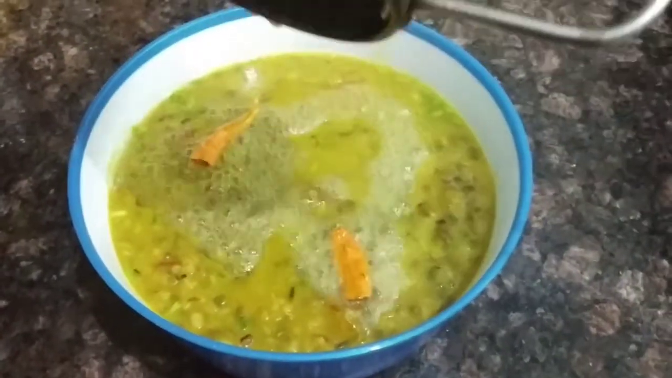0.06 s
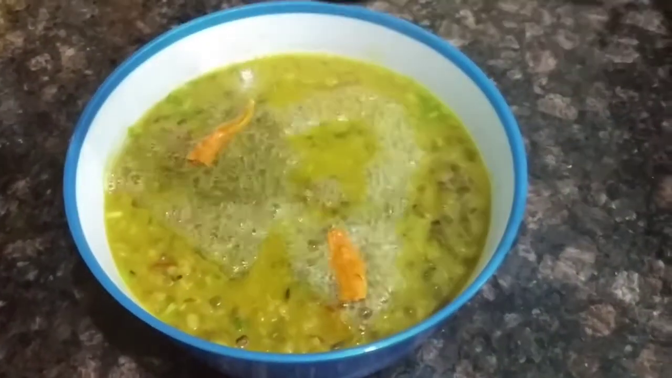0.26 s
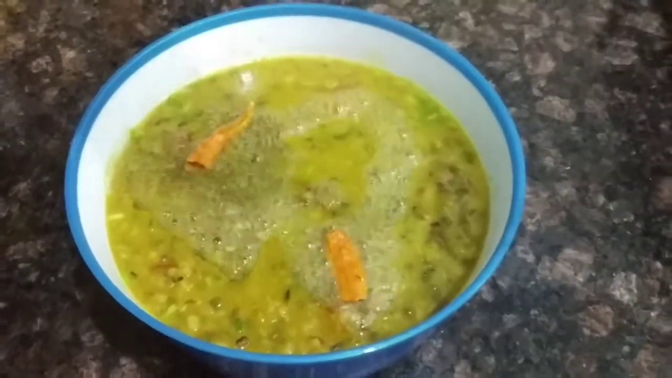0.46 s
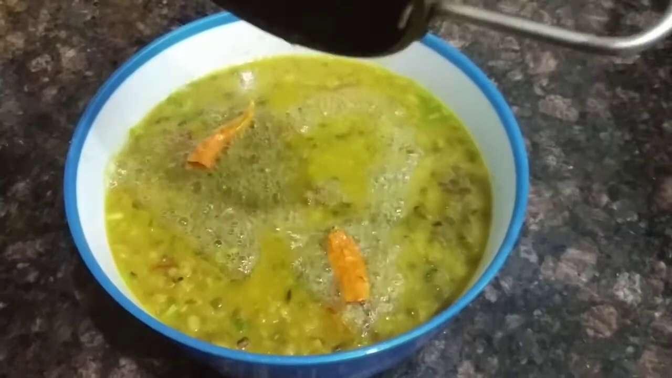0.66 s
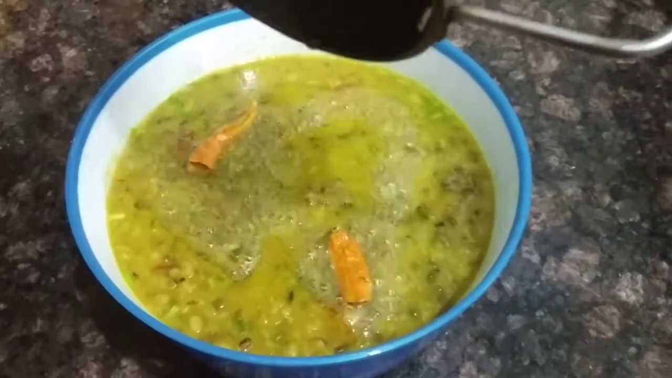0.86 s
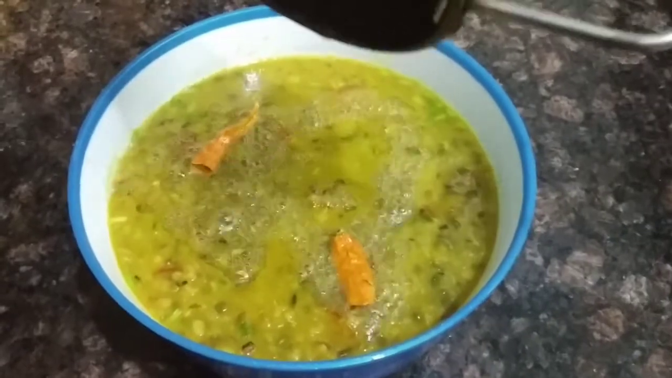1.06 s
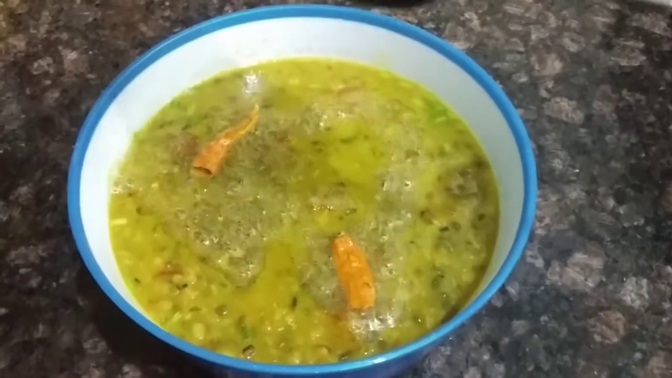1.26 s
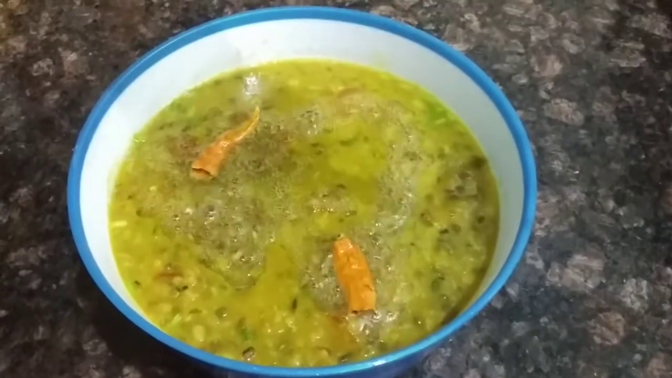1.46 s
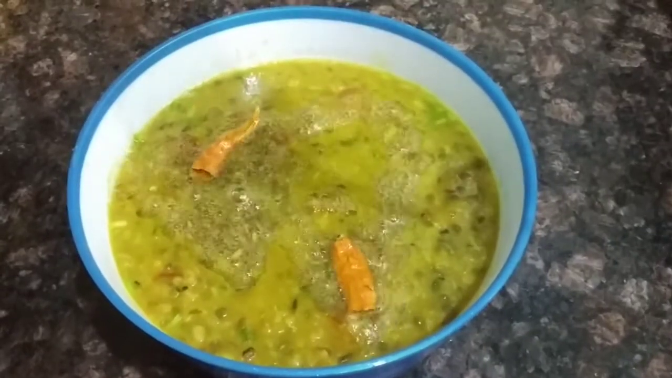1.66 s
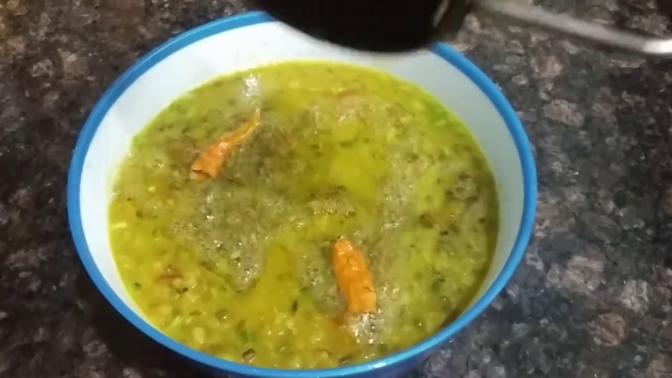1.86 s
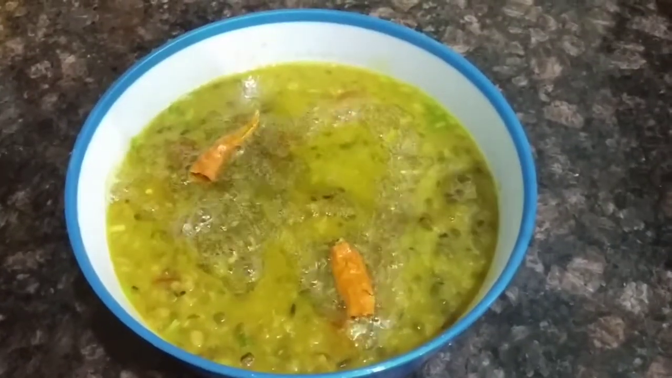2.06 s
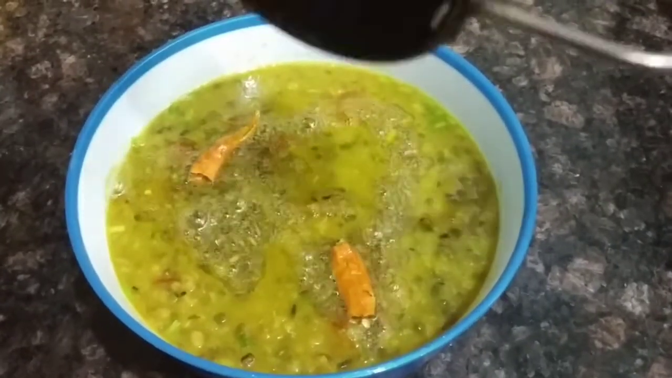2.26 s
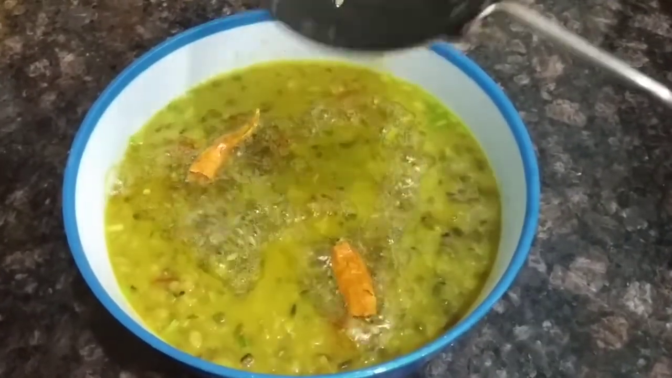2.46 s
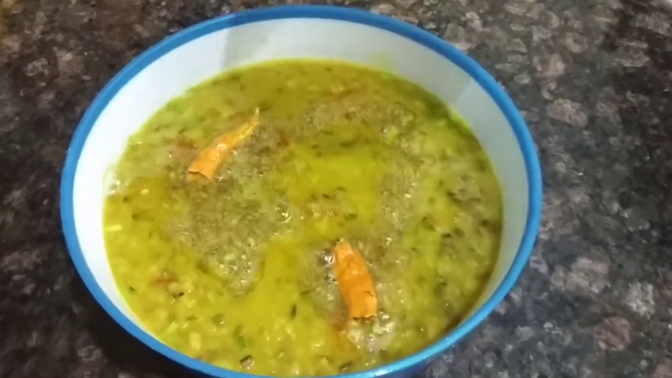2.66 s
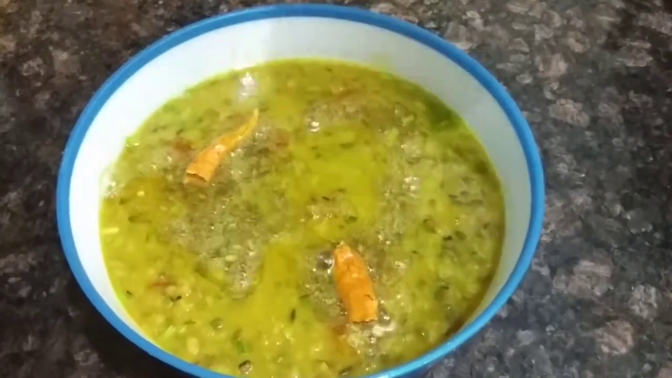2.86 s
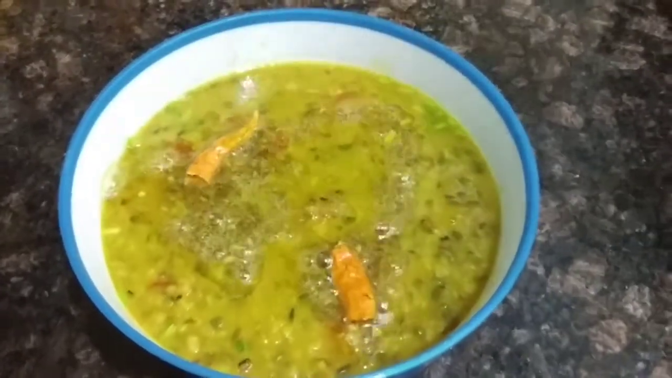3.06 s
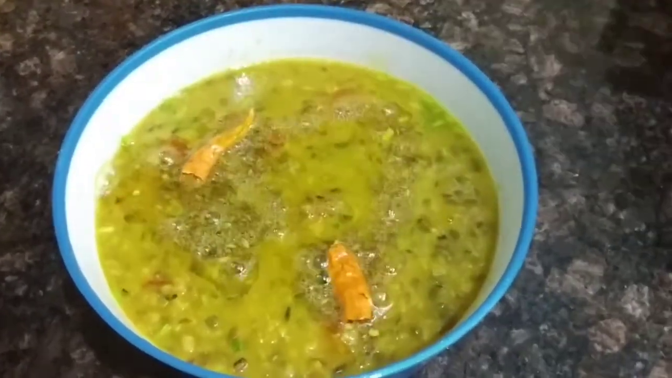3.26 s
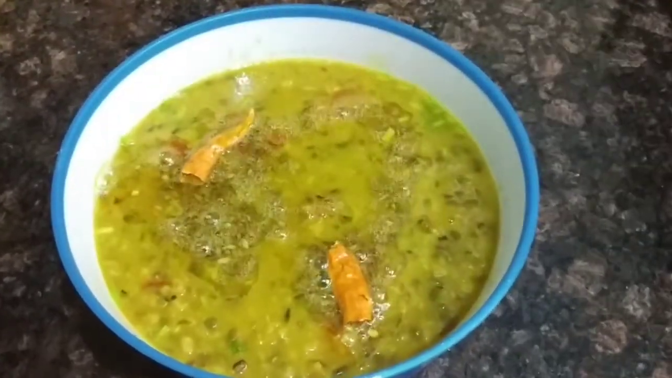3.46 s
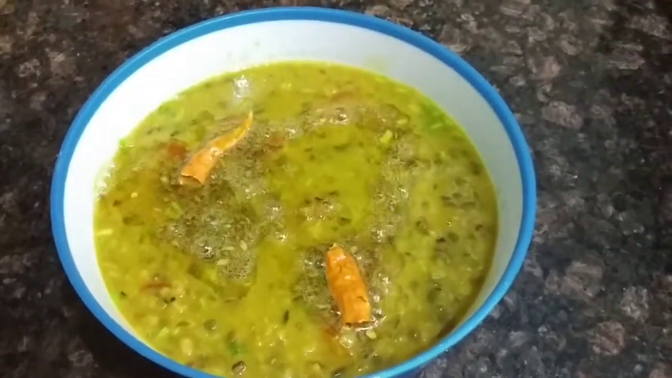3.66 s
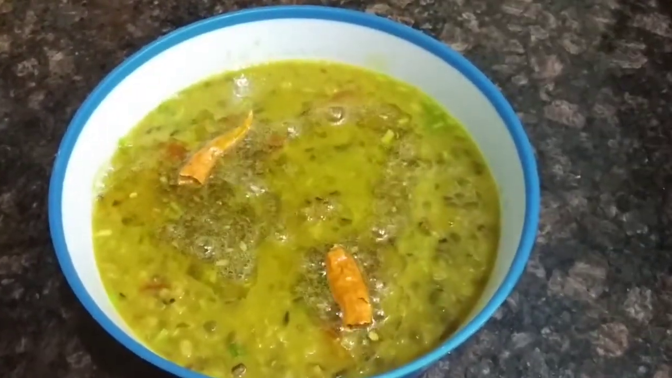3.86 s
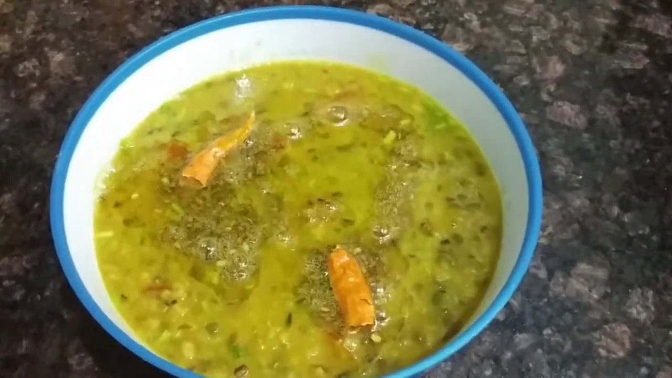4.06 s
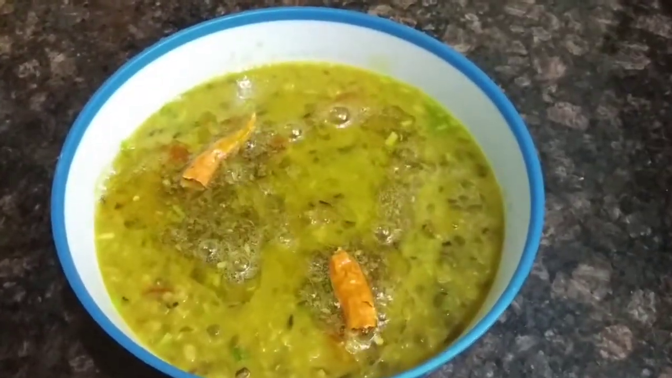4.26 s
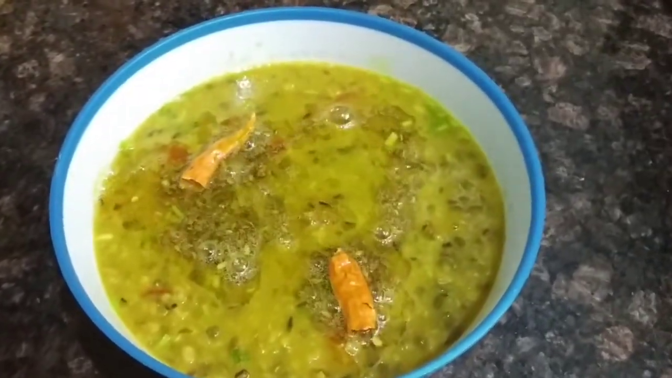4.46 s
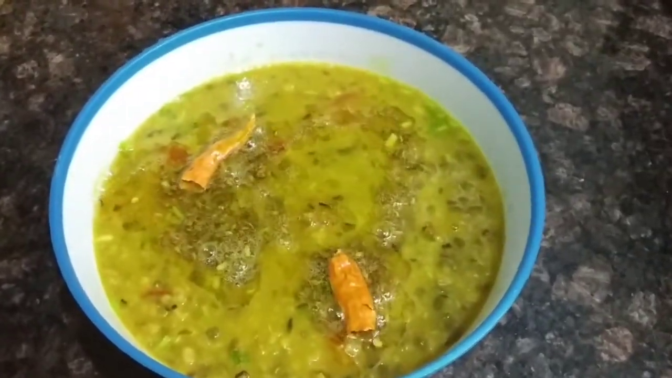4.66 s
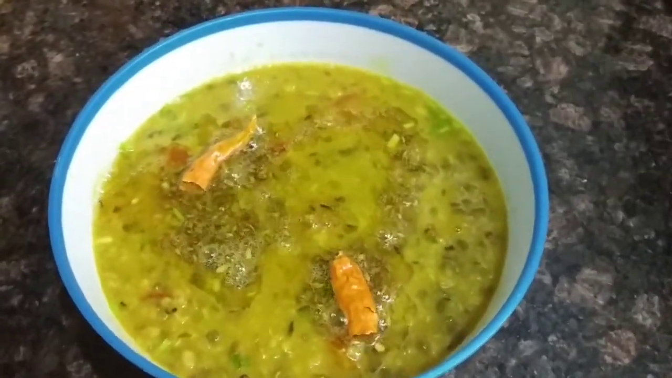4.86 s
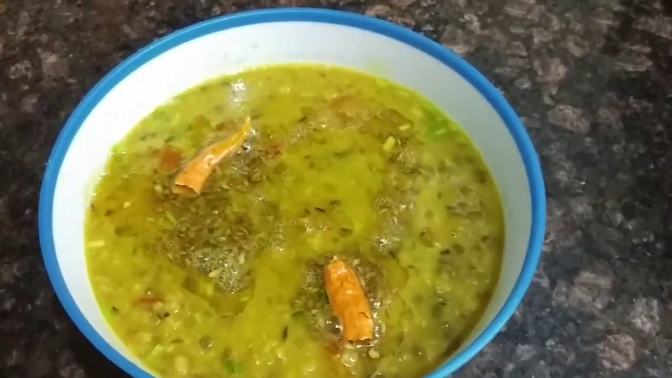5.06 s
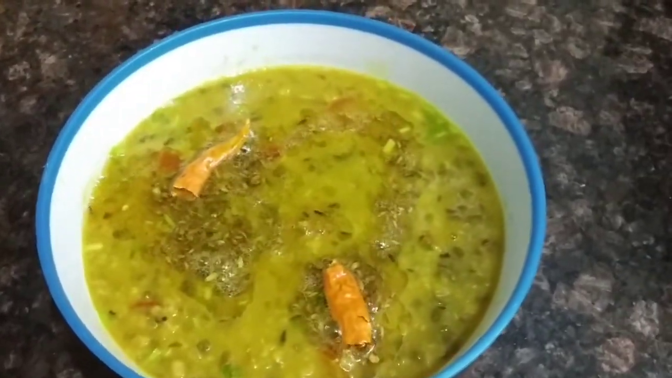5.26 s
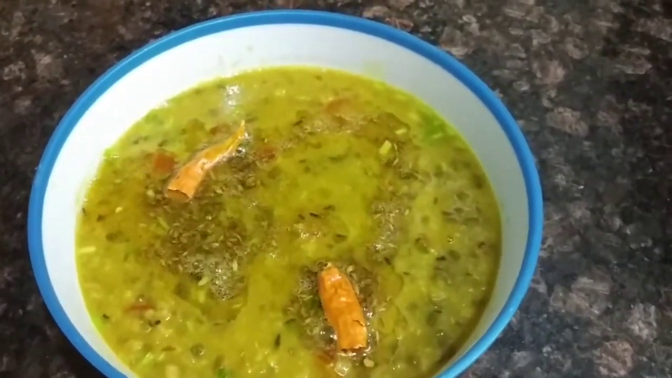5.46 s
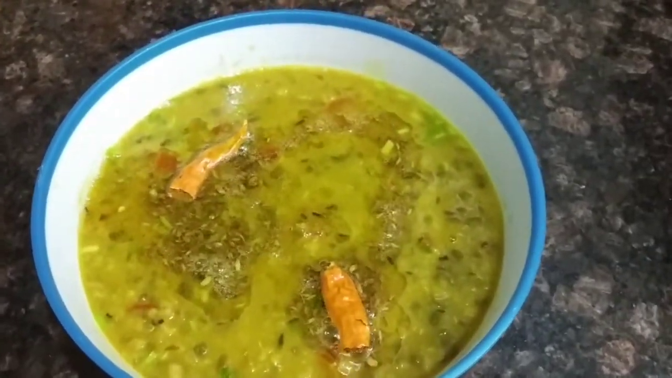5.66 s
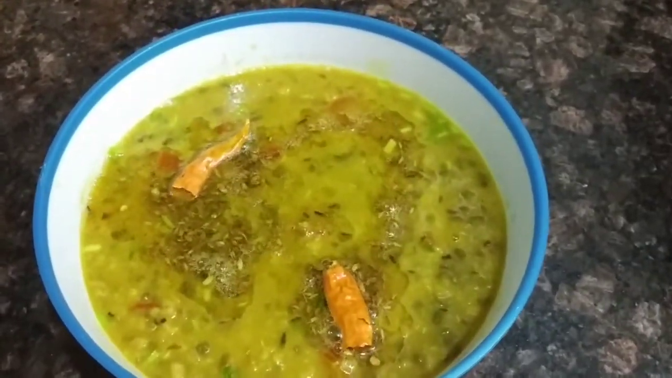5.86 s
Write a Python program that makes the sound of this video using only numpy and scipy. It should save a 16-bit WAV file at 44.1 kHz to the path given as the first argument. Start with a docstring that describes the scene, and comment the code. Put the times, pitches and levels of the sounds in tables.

```python
"""Hot spiced oil sizzles on a bowl of lentils in a small kitchen, close to a stereo microphone.
Clouds of short damped rings make the dense fizz; it breaks up into spurts and single bursts as the oil cools.
The emptied pan touches the stove twice and is set down with a clank: filtered noise and ringing modes.
A few clicks follow. A wavering sine is the fan's hum; shaped noise makes rumble, room air and hiss."""
import sys
import numpy as np
from scipy import signal
from scipy.fft import rfft, irfft, next_fast_len
from scipy.io import wavfile
from scipy.ndimage import uniform_filter1d, map_coordinates

SR = 44100
rng = np.random.default_rng(int(sys.argv[2]) if len(sys.argv) > 2 else 0)


def bounce(signal):
    """Save signal as a 16-bit WAV file at the path given by the first command-line argument."""
    frames = np.transpose(np.atleast_2d(signal))
    limited = np.clip(frames, -1, 1)
    pcm = np.round(limited * 32767).astype(np.int16)
    wavfile.write(sys.argv[1], SR, pcm)


N = 260614
TOP_HZ = 15800  # band limit
PORT_LAG_S = 0.000118  # the left port hears a burst or click this much after the right


def amp(db):
    """Decibel law: level to amplitude gain."""
    return 10 ** (np.asarray(db) / 20)


def unit(x):
    """Normalisation to rms 1."""
    return x / np.sqrt(np.mean(x ** 2) + 1e-20)


def along(points, hz):
    """Interpolation of (f/Hz, value) points on a logarithmic frequency axis."""
    f, v = np.transpose(points)
    return np.interp(np.log(hz + 1), np.log(f + 1), v)


def curves(rows):
    """Linear interpolation in time: one curve for each column after t/s."""
    times, *columns = np.transpose(rows)
    return [np.interp(np.arange(N) / SR, times, column) for column in columns]


def wobble(rate):
    """Band-limited random modulation: a smooth curve through `rate` random knots a second."""
    knots = rng.standard_normal(int(N * rate / SR) + 4)
    return map_coordinates(knots, [np.arange(N) * rate / SR])


def filtered(x, response):
    """Linear filtering: the spectrum of x times a response of frequency."""
    size = x.shape[-1]
    padded = next_fast_len(size + 8192)
    return irfft(rfft(x, padded) * response(np.fft.rfftfreq(padded, 1 / SR)), padded)[..., :size]


def panned(side_db):
    """Intensity stereo: left and right gains of mean power 1, left minus right in dB."""
    side_db = np.atleast_1d(side_db)
    pair = amp(np.array([side_db, -side_db]) / 2)
    return pair / np.sqrt(np.mean(pair ** 2, axis=0))


def add(out, s, x):
    """Superposition: mix x into out at time s."""
    part = out[:, max(0, round(s * SR)):][:, :x.shape[1]]
    part += x[:, :part.shape[1]]


def ring(turns, cycles):
    """Damped oscillation: swells for `cycles` periods, then dies; its envelope peaks at 1."""
    age = np.maximum(turns, 0) / cycles
    return np.sin(2 * np.pi * turns) * age * np.exp(1 - age)


def resonance(f, hz, width):
    """Simple resonator: response of one damped mode, 1 at its peak."""
    return 1j * f * width / (hz ** 2 - f ** 2 + 1j * f * width)


def surge(t, rise, hold, t60):
    """Attack, hold and exponential decay: gain that reaches 1 at t = 0."""
    return np.clip(1 + t / rise, 0, 1) * amp(-60 * np.clip((t - hold) / t60, 0, 2))


# likeness of the two channels of diffuse noise: (f/Hz, correlation)
CHANNEL_LIKENESS = [(60, 0.44), (280, 0.6), (640, 0.49), (1400, 0), (15000, 0.13)]


def diffuse(spectrum, size):
    """Diffuse field: shaped stereo noise of rms 1 whose channel correlation depends on frequency."""
    def response(hz):
        turn = np.arccos(np.clip(along(CHANNEL_LIKENESS, hz), -1, 1)) / 2
        return amp(along(spectrum, hz)) * [np.cos(turn), np.sin(turn)]
    mid, side = filtered(rng.standard_normal((2, size)), response)
    return unit(np.array([mid + side, mid - side]))


# microphone hiss: (f/Hz, relative spectral level/dB)
HISS_SPECTRUM = [(500, -7.5), (1500, -1), (4000, -6), (11000, -12.5), (15000, -8.5)]


def hiss():
    """Self-noise: a steady, faint microphone hiss."""
    return amp(-71.0) * diffuse(HISS_SPECTRUM, N)


# dull room noise: (f/Hz, relative spectral level/dB)
AIR_SPECTRUM = [(60, -5), (120, -7.5), (160, -6.5), (215, -5), (275, -1), (315, -2.5), (370, -3.5),
                (500, -7), (800, -15.5), (1500, -21), (5000, -34)]
# its mean level, about which it wavers: (t/s, level/dB)
AIR_LEVEL = [(0, -68), (1.0, -68.5), (1.5, -63.5), (1.8, -69.5), (2.4, -67.5), (3.05, -64.5), (3.45, -68.5),
             (4.8, -69), (5.2, -65), (5.6, -71.5)]


def room_air():
    """Broadband noise, weighted to the bass and modulated in level."""
    level_db, = curves(AIR_LEVEL)
    return amp(level_db + 2.9 * wobble(19)) * diffuse(AIR_SPECTRUM, N)


# low rumble: (f/Hz, relative spectral level/dB)
RUMBLE_SPECTRUM = [(10, -7), (22, -0.5), (42, -2), (55, -4.5), (70, -7), (110, -12), (170, -24.5),
                   (500, -49), (1500, -120)]
# its swells, before the lumpy gain: (t/s, level/dB, hold/s)
RUMBLE_SWELLS = [(1.023, -62, 0.098), (1.336, -54.5, 0.26), (2.343, -55, 0.21), (2.699, -64.5, 0.61),
                 (4.806, -62.5, 0.53), (5.67, -54, 0.039)]
RUMBLE_FLOOR_DB, RUMBLE_RISE_S, RUMBLE_T60_S = -62.5, 0.037, 0.47  # floor also before the lumpy gain


def rumble():
    """Amplitude modulation: low noise that swells over a floor and is lumpy throughout."""
    t = np.arange(N) / SR
    swells = amp(RUMBLE_FLOOR_DB)
    for s, db, hold in RUMBLE_SWELLS:
        swells = swells + amp(db) * surge(t - s, RUMBLE_RISE_S, hold, RUMBLE_T60_S)
    lumps = amp(2.0 * wobble(16) - 4.0)
    return swells * lumps * diffuse(RUMBLE_SPECTRUM, N)


# the hum swells and sinks: (t/s, mean level/dB)
FAN_LEVEL = [(0, -72), (0.62, -66), (1.2, -73), (1.6, -59), (2.7, -56.5), (3.22, -71), (3.45, -64),
             (4.3, -54), (4.92, -73), (5.08, -61), (5.9, -58)]
FAN_HZ, FAN_WANDER_HZ, FAN_WAVER_DB = 83.2, 0.28, 0.75


def fan():
    """Frequency and amplitude modulation: one sine, wavering in pitch and level, is the fan's hum."""
    level_db, = curves(FAN_LEVEL)
    hz = FAN_HZ + FAN_WANDER_HZ * wobble(5.8)
    gain = np.sqrt(2) * amp(level_db + FAN_WAVER_DB * wobble(7.9))
    return gain * np.sin(2 * np.pi * np.cumsum(hz) / SR)


def background():
    """Superposition of hum, rumble, room air and hiss, stronger on the right."""
    return (fan() + rumble() + room_air() + hiss()) * panned(-3.5)


# the fade is per thump
FLUTTER_START_S, FLUTTER_PER_S, FLUTTER_DB, FLUTTER_HZ, FLUTTER_FADE_DB = 1.15, 21, -46, 18.7, 2.0


def flutter():
    """Impulsive pressure pulses: uneven, weakening low thumps, perhaps air buffeting the microphone."""
    out, t = np.zeros((2, N)), np.arange(SR // 5) / SR
    for k, (timing, size) in enumerate(rng.standard_normal((10, 2))):
        gain = amp(FLUTTER_DB - FLUTTER_FADE_DB * k + 1.47 * size)
        thump = gain * ring(FLUTTER_HZ * t, cycles=0.28)
        add(out, FLUTTER_START_S + (k + 0.093 * timing) / FLUTTER_PER_S, thump * panned(-5.0))
    return out


# reverberation of the kitchen: (f/Hz, T60/s)
KITCHEN_T60 = [(200, 0.51), (1000, 0.66), (4000, 0.16), (14000, 0.3)]


def kitchen(x):
    """Reverberation: hard walls answer with noise that decays at a rate set by frequency."""
    hz, t, z = signal.stft(rng.standard_normal((2, SR * 3 // 4)), SR, nperseg=256)
    decay = amp(-60 * t / along(KITCHEN_T60, hz)[:, None])
    tail = signal.istft(z * decay, SR, nperseg=256)[1]
    tail = np.pad(tail, ((0, 0), (130, 0)))  # samples of delay before the tail
    mono = x.sum(0)[None] / np.sqrt(2)
    return signal.fftconvolve(mono, tail / np.linalg.norm(tail[0]), axes=1)[:, :N] * panned(-2.3)


def counter(x):
    """Early reflection: the bowl's wall and the stone counter throw back a few quick echoes."""
    echoes = np.zeros((2, SR // 50))
    for port in echoes:
        port[rng.integers(SR // 2000, SR // 65, size=8)] = rng.standard_normal(8)
    echoes /= np.linalg.norm(echoes, axis=1, keepdims=True)
    return signal.fftconvolve(x, echoes, axes=1)[:, :N]


# light clicks of something hard, perhaps the stove's knob:
# (t/s, snap level/dB, f/Hz, chatter level/dB before its decay gain)
CLICKS = [(5.1489, -29.5, 2980, -47), (5.2388, -39, 2757, -62.5), (5.2987, -44, 3930, -79),
          (5.3092, -42, 3200, -73), (5.415, -37, 3950, -51.5), (5.4256, -34, 5374, -64)]
CLICK_EDGE_DB, CLICK_EDGE_HZ = -5, 5260  # bright edge, relative to the snap


def clicks():
    """Transient excitation: a sudden damped snap with a bright edge, then decaying noise as parts chatter."""
    out, t = np.zeros((2, N)), np.arange(SR // 3) / SR
    heard = t - np.array([[PORT_LAG_S], [0]])
    for s, db, hz, chatter_db in CLICKS:
        edge = amp(CLICK_EDGE_DB) * ring(CLICK_EDGE_HZ * heard, cycles=0.44)
        snap = ring(hz * heard, cycles=0.72) + edge
        grain = np.repeat(rng.standard_normal(len(t)), 48)[:len(t)]
        grit = rng.standard_normal((2, len(t))) * amp(1.2 * grain)
        chatter = unit(filtered(grit, lambda f: 1 / (1 + 1.63 * (f / hz - hz / (f + 1)) ** 2)))
        # quick, medium and slow decays together
        dying = amp(8.5 - 60 * t / 0.0098) + amp(-60 * t / 0.13) + amp(-9.0 - 60 * t / 0.4)
        add(out, s, amp(db) * snap + amp(chatter_db) * dying * chatter)
    return out * panned(-5.5)


# the pan's modes, shared by rattle and strikes: (f/Hz, relative level/dB, T60/s of a struck mode)
PAN_MODES = [(270, -6, 0.44), (365.4, -6, 0.34), (395.2, -2.5, 0.17), (505, -6, 0.3), (602, -7, 0.28),
             (730.4, -7.5, 0.33), (1170, -7, 0.24), (1243, -6, 0.21), (1298, -1, 0.15), (1477, -4, 0.14),
             (1660, -1, 0.18), (1780, -4, 0.2), (1870, -3, 0.13), (2030, -4.5, 0.2), (2180, 0, 0.14),
             (2440, -2, 0.18), (2680, -8, 0.2), (3090, -4, 0.18), (3720, -6, 0.15), (3970, -2, 0.17),
             (4730, 1, 0.19), (5577, 0, 0.086), (6170, 6, 0.084), (6430, 4.5, 0.11), (7360, -9, 0.2),
             (8306, -11, 0.15), (10600, -5.5, 0.17)]
# clatter of pan on stove: (f/Hz, relative spectral level/dB)
CLATTER_SPECTRUM = [(100, -1.5), (200, -1), (270, 0.5), (400, -4), (750, 3), (1000, -3), (1350, -3),
                    (2300, -0.5), (3100, -10), (6500, -10), (9000, -22), (15000, -40)]
# rattles: (t/s, level/dB before the mix, low-pass corner f/Hz, rise constant/s, hold/s, T60/s,
#           hollow note f/Hz, note width/Hz, note relative level/dB)
RATTLES = [(3.884, -47, 2784, 0.003, 0.033, 0.1, 1300, 160.2, -10),
           (4.131, -49, 1700, 0.005, 0.025, 0.21, 806, 258, 1.5),
           (4.2969, -37.5, 6500, 0.0011, 0.055, 0.18, 377, 69, -10.5)]
RATTLE_VALLEY_DB = -2  # response of the clatter between the pan's modes


def pan():
    """Forced vibration: the pan rattles to rest on the stove, a dense noise that feeds its modes."""
    out, t = np.zeros((2, N)), np.arange(SR * 2 // 3) / SR
    mode_hz, mode_db, _ = np.transpose(PAN_MODES)[:, :, None]

    def body(f):
        modes = amp(mode_db) * resonance(f, mode_hz, 14 + 0.013 * mode_hz)
        return np.sqrt(amp(RATTLE_VALLEY_DB) ** 2 + np.sum(np.abs(modes) ** 2, axis=0))

    def noise():
        return rng.standard_normal((2, len(t)))

    for s, db, dull_hz, rise, hold, t60, note_hz, note_width, note_db in RATTLES:
        onset = 1 - np.exp(-t / rise)
        # the rattle keeps up for a moment, then dies
        rattle = amp(-60 * np.maximum(t - hold, 0) / t60) * onset
        clatter = unit(filtered(diffuse(CLATTER_SPECTRUM, len(t)), body)) * rattle
        note = unit(filtered(noise(), lambda f: resonance(f, note_hz, note_width) ** 2)) * rattle
        scrape = amp(-60 * t / 0.071) * onset * noise()
        mix = amp(-1.0) * clatter + amp(note_db) * note + scrape
        add(out, s, amp(db) * filtered(mix, lambda f: 1 / (1 + 1j * f / dull_hz)))
    return out


# hard strikes of the pan's base within each rattle:
# (t/s, ring level/dB before mode levels, crack level/dB, crack f/Hz, ring low-pass corner f/Hz)
STRIKES = [(3.8877, -59.5, -45, 1700, 2600), (3.898, -56, -41.5, 500, 2200),
           (3.911, -61.5, -55, 2202, 2800), (4.136, -55.5, -51, 900, 2000), (4.148, -56, -43.5, 730, 1500),
           (4.2999, -40, -42, 3500, 12000), (4.307, -46, -31, 3500, 7000), (4.3106, -48.5, -40, 500, 1500),
           (4.329, -46.5, -32, 1305, 2500), (4.342, -50, -31, 1502, 2500), (4.363, -52, -38, 1500, 4000),
           (4.395, -60.5, -43, 2000, 6000)]
MODE_ROUGH = 0.55  # phase waver of the rocking pan's modes (radians)
MODE_ALIKE_HZ = 901.4  # below this the ports hear a mode increasingly in step
CRACK_T60_S = 0.026


def strikes():
    """Modal superposition: each hard contact gives a dry crack and rings the pan's decaying modes."""
    out, t = np.zeros((2, N)), np.arange(SR // 2) / SR
    mode_hz, mode_db, t60 = np.transpose(PAN_MODES)[:, :, None]
    for s, ring_db, crack_db, crack_hz, dull_hz in STRIKES:
        shared, apart = rng.uniform(-np.pi, np.pi, (2, len(PAN_MODES), 1))
        phase = shared + np.array([apart, -apart]) / 2 * np.minimum(mode_hz / MODE_ALIKE_HZ, 1)
        waver = MODE_ROUGH * signal.resample(rng.standard_normal((len(PAN_MODES), 50)), len(t), axis=1)
        onset = 1 - np.exp(-t / 0.0008)
        fade = amp(mode_db - 60 * t / t60) / np.hypot(1, mode_hz / dull_hz) * onset
        metal = np.sum(fade * np.sin(2 * np.pi * mode_hz * t + phase + waver), axis=1)
        noise = rng.standard_normal((2, len(t)))
        crack = unit(filtered(noise, lambda f: 1 / (1 + 0.71 * (f / crack_hz - crack_hz / (f + 1)) ** 2)))
        add(out, s, amp(ring_db) * metal + amp(crack_db - 60 * t / CRACK_T60_S) * crack)
    return out


def bubbles(per_second, pitch_hz, spread, cycles, scatter_db, wander_db, size):
    """Random point process: a cloud of tiny rings, each with its own pitch, strength and place; rms 1."""
    at = np.flatnonzero(rng.random(N) < np.minimum(per_second, 14000) / SR)
    tone, place, lag = rng.standard_normal((len(at), 3)).T
    hz = np.clip(pitch_hz * np.exp(spread * tone), 200, SR / 2.2)[:, None]
    # dividing by the root of the rate keeps the power even
    strength = amp(scatter_db * np.minimum(rng.exponential(size=len(at)), 3.2)) / np.sqrt(per_second[at])
    delays = PORT_LAG_S * (2 + lag[:, None]), PORT_LAG_S
    slots = (at[:, None] + np.arange(size)).ravel()
    cloud = []
    for gain, delay in zip(panned(wander_db * place), delays):
        notes = ring(hz * (np.arange(size) / SR - delay), cycles)
        rings = (gain * strength)[:, None] * np.sqrt(hz) * notes
        cloud.append(np.bincount(slots, rings.ravel(), N + size)[:N])
    return unit(np.array(cloud))


TICKS_PER_S, TICKS_DB, TICKS_HZ = 27, -71.5, 6670  # rate, rms level, typical pitch


def ticks():
    """Sparse point process: faint dry ticks of single bubbles, uncovered as the fizz fades."""
    cloud = bubbles(np.full(N, TICKS_PER_S), pitch_hz=TICKS_HZ, spread=0.47, cycles=0.6,
                    scatter_db=4.0, wander_db=5.5, size=96)
    return amp(TICKS_DB) * cloud * panned(-2.0)


STRAY_PER_S, STRAY_DB, STRAY_SPRAY_DB = 3.6, -45.5, -70.5  # rate, mean levels before the trims in pops()
STRAY_HZ, STRAY_SIDE_DB = 5760, 2  # typical pitch; mean left minus right


def strays():
    """Poisson process: rows like BURSTS for smaller bursts, random in time, strength, pitch and place."""
    draws = rng.standard_normal((64, 4))
    times = np.cumsum(rng.exponential(size=len(draws))) / STRAY_PER_S
    rows = []
    for s, (size, tone, place, wet) in zip(times, draws):
        if s < N / SR:
            hz = min(STRAY_HZ * np.exp(0.57 * tone), TOP_HZ)
            rows.append((s, STRAY_DB + 4 * size, hz, STRAY_SIDE_DB + 6 * place, STRAY_SPRAY_DB + 3 * wet))
    return rows


# the loudest bursting bubbles, levels and pan before the trims below:
# (t/s, snap level/dB, f/Hz, left minus right/dB, spray level/dB)
BURSTS = [(0.0095, -17, 8200, -3, -46), (0.0405, -19, 7500, -6, -38), (0.0887, -22, 8800, -2, -40),
          (0.1028, -24, 5600, -6, -46), (0.7765, -24, 11400, -1, -44), (1.2178, -19, 7400, -37, -31.5),
          (1.418, -11, 10300, 17, -58), (1.58, -20, 9274, -22, -36.5), (1.647, -18, 10820, 3, -36.5),
          (1.728, -39, 7804, -14, -43), (1.7872, -33, 6500, -11, -49), (1.9385, -14, 9095, -30, -48),
          (2.056, -35, 6970, 11, -41), (2.0993, -28, 10230, -1, -52), (2.1187, -19, 10180, -1, -48),
          (2.24, -33, 2486, -1, -47), (2.2784, -24, 8600, -14, -48), (2.3116, -24, 8810, -7, -44),
          (2.3216, -19, 8760, -12, -46), (2.366, -37.5, 2194, -2, -51), (2.4518, -20, 8390, -22, -59),
          (2.4971, -25, 10650, -6, -42), (2.5127, -20.5, 3120, -10, -45), (2.5147, -13, 11460, -2, -35),
          (2.5793, -24, 11010, 1, -45.5), (2.627, -34, 10890, -1, -48), (2.629, -45, 1750, 6, -48.5),
          (2.7101, -34, 7970, -9, -56), (2.7147, -47, 5983, -4, -51), (2.7525, -25, 9410, -13, -55),
          (2.757, -35.5, 2045, 3, -49.5), (2.7996, -29, 2716, -15, -52), (2.8018, -29, 9000, -8, -59),
          (2.8739, -41, 6046, -11, -44), (2.9306, -21, 10590, -6, -42), (2.9808, -31, 7915, -4, -56),
          (2.987, -33, 5640, -2, -50), (3.0235, -20.5, 11190, -14, -41), (3.027, -34, 2500, -6, -44.5),
          (3.0475, -23, 6860, -21, -40.5), (3.0497, -21, 2860, -6, -48), (3.0533, -30, 6400, -9, -60),
          (3.094, -49, 2222, -5, -61), (3.1136, -23, 9480, -17, -59), (3.173, -44, 1298, 3, -49),
          (3.2025, -22, 4630, -11, -41.5), (3.2066, -22, 4904, -5, -52), (3.2172, -30, 4750, -5, -39.5),
          (3.259, -36, 7950, -3, -59), (3.3207, -42, 7546, -14, -69), (3.3425, -27, 11230, -17, -58),
          (3.4305, -31, 5700, -20, -68), (3.4908, -23.5, 6270, -18, -59), (3.4963, -28, 5200, -18, -66),
          (3.5178, -27, 10550, -17, -69), (3.5468, -26, 10430, -20, -58), (3.7443, -34, 6180, -19, -58),
          (3.8182, -29, 6340, -12, -68), (3.8312, -24.5, 9390, -14, -56), (3.8845, -31, 7930, 1, -50),
          (3.9291, -23, 10400, -16, -50), (4.0263, -28, 12040, -8, -50), (4.0618, -29, 4540, -13, -49.5),
          (4.0738, -15.5, 12600, -14, -52), (4.0881, -27, 9750, -12, -62), (4.2551, -20, 10690, -13, -66),
          (4.6841, -30.5, 5140, 0, -59), (4.821, -27, 6180, -7, -57), (4.901, -41, 1980, 2, -55.5),
          (4.9694, -31, 5980, -7, -71), (5.0544, -36, 6950, -19, -55), (5.2585, -27.5, 6450, -16, -75),
          (5.2615, -29, 6690, -14, -75), (5.3597, -39, 5725, -6, -66), (5.4235, -39, 9070, -16, -49),
          (5.7026, -34, 4100, -10, -51), (5.7254, -28, 7960, -17, -54), (5.748, -18, 7535, -25, -54.5)]
SWELL_T60_S, SPRAY_T60_S = 0.024, 0.06  # rise of the noise before the snap and decay after it
SPRAY_GRAIN_DB = 4.5  # spread of the droplets' sizes
TEAR_DB, TEAR_CYCLES = -10.5, 0.18  # tick of the tearing skin, relative to the note; its length


def pops():
    """Damped transient: a quick swell of noise leads into a brief damped note, then a short spray."""
    lead = .014  # the swell starts this long before the snap (s)
    out, t = np.zeros((2, N)), np.arange(SR // 8) / SR - lead
    swell = amp(-60 * np.maximum(t / SPRAY_T60_S, -t / SWELL_T60_S))
    for s, db, hz, side_db, spray_db in list(BURSTS) + strays():
        turns = hz * (t - np.array([[PORT_LAG_S], [0]]))
        snap = ring(turns, cycles=1.0) + amp(TEAR_DB) * ring(turns, TEAR_CYCLES)
        grain = np.repeat(rng.standard_normal(len(t)), 20)[:len(t)]
        drops = rng.standard_normal((2, len(t))) * amp(SPRAY_GRAIN_DB * grain)
        # the spray gathers round the bubble's own pitch
        spray = unit(filtered(drops, lambda f: 1 / np.sqrt(1 + 1.5 * (f / hz - hz / (f + 1)) ** 2)))
        burst = amp(db - 9.0) * snap * panned(side_db)
        burst = burst + amp(spray_db - 1.5) * swell * spray * panned(0.62 * side_db)
        add(out, s - lead, burst)
    return out


def patchy(x, depth_db, boil):
    """Time-frequency modulation: brief random patches of colour, which even out in a hard boil."""
    z = signal.stft(x, nperseg=256)[2]
    field = rng.standard_normal(z.shape[1:])
    for axis in (0, 1):
        field = uniform_filter1d(field, size=6, axis=axis)
    evenness = 1 + 1.5 * boil[np.linspace(0, N - 1, z.shape[2]).astype(int)]
    return signal.istft(z * amp(depth_db * unit(field) / evenness), nperseg=256)[1][:, :N]


# the steady boil dies down as the oil cools; levels before the trims in sizzle():
# (t/s, level/dB of the fizz of tiny bubbles, level/dB of the crackle of larger ones)
BOIL_LEVEL = [(0, -29.5, -45.5), (0.12, -32.5, -48), (0.36, -32.5, -49.5), (0.45, -38.5, -51.5),
              (0.98, -39.5, -52.5), (1.1, -43.5, -55), (1.62, -43, -54), (1.7, -52, -63),
              (2.15, -52, -58.5), (2.36, -56.5, -62), (2.68, -59.5, -61.5), (3.0, -57.5, -66),
              (3.33, -59.5, -72), (3.65, -65.5, -75), (4.5, -63.5, -67.5), (4.75, -72.5, -93),
              (5.3, -71, -63), (5.55, -72, -75.5), (5.9, -69, -66.5)]
# spurts of steam through the oil, before the same trims:
# (t/s, fizz level/dB, crackle level/dB, hold/s, left minus right/dB)
STEAM_SPURTS = [(0.024, -30, -64, 0.016, -8), (0.153, -37.5, -48.5, 0.14, -38),
                (0.494, -38.5, -53.5, 0.026, 2), (0.678, -41, -56, 0.03, -1), (0.794, -39, -56, 0.032, 3),
                (0.941, -41, -59, 0.045, -6), (1.14, -44, -51, 0.025, 0), (1.215, -37, -49, 0.043, -28),
                (1.275, -38, -55, 0.028, -5), (1.373, -39.5, -53.5, 0.045, 0.5),
                (1.571, -41, -58.5, 0.029, -21), (1.632, -42, -47.5, 0.015, -2.5),
                (1.728, -47, -53, 0.012, -1), (1.83, -51.5, -60.5, 0.027, -20),
                (1.914, -43.5, -57.5, 0.056, -19), (1.99, -48.5, -49.5, 0.035, 1.5),
                (2.055, -46, -54.5, 0.056, -1), (2.229, -45, -50.5, 0.046, -10),
                (2.407, -46, -66, 0.031, -16), (2.511, -52, -55, 0.02, -5), (2.618, -49, -65, 0.012, -4),
                (2.787, -53, -58, 0.025, -13), (2.865, -52, -49, 0.0097, -6.5),
                (2.916, -53, -54, 0.0083, -3), (3.046, -52, -52.5, 0.044, -4),
                (3.208, -51, -57.5, 0.045, -7), (3.278, -53.5, -52, 0.033, -10),
                (3.431, -55.5, -67, 0.02, -17), (3.485, -53, -80, 0.042, -6),
                (3.746, -59, -69.5, 0.025, -15), (3.813, -56, -80, 0.026, -11),
                (4.048, -58, -57.5, 0.033, -7), (4.236, -56.5, -74, 0.0099, -6),
                (4.596, -60, -70, 0.049, -5), (4.818, -61.5, -71, 0.049, -5), (4.956, -59, -86, 0.039, -1),
                (5.418, -61, -58, 0.03, -14), (5.722, -61.5, -59.5, 0.041, -5)]
SPURT_RISE_S, SPURT_T60_S = 0.012, 0.14
BOIL_SIDE_DB, BOIL_DRIFT_DB = -3.5, 2.5  # left minus right of the steady boil, and its drift round the bowl


def steam_flow():
    """Addition of powers: the steady boil plus its spurts, left and right, for fizz and for crackle."""
    fizz_db, crackle_db = curves(BOIL_LEVEL)
    place = panned(BOIL_SIDE_DB + BOIL_DRIFT_DB * wobble(6.96)) ** 2
    fizz, crackle = amp(fizz_db) ** 2 * place, amp(crackle_db) ** 2 * place
    t = np.arange(SR // 3) / SR - SPURT_RISE_S
    for s, spurt_fizz_db, spurt_crackle_db, hold, side_db in STEAM_SPURTS:
        spurt = surge(t, SPURT_RISE_S, hold, SPURT_T60_S) * panned(side_db)
        add(fizz, s - SPURT_RISE_S, (amp(spurt_fizz_db) * spurt) ** 2)
        add(crackle, s - SPURT_RISE_S, (amp(spurt_crackle_db) * spurt) ** 2)
    return fizz, crackle


# colour of the fizz: (f/Hz, filter level/dB)
FIZZ_SPECTRUM = [(880, -42), (1500, -10.5), (2100, -23.5), (2800, -9), (4000, -9.5), (4700, -4), (6910, -3),
                 (11100, -2.5), (14900, -9), (15800, -9.5)]
# colour of the crackle: (f/Hz, filter level/dB)
CRACKLE_SPECTRUM = [(150, -19), (450, 4), (750, -5), (1100, -1), (1500, -7), (2600, 3), (3600, 4.5),
                    (6000, -3), (12000, -33)]
HARD_BOIL_DB = -31  # fizz level, before its trim, at which the bubbles are densest


def sizzle():
    """Flash boiling: water turns to steam under the oil; the harder it boils, the denser the bursts."""
    fizz_power, crackle_power = steam_flow()
    boil = np.minimum(np.sqrt(fizz_power.mean(0)) / amp(HARD_BOIL_DB), 1)

    tiny = bubbles(1500 + 9000 * boil, pitch_hz=8260, spread=0.41, cycles=0.56,
                   scatter_db=2.0, wander_db=1.5, size=64)
    steam = amp(-10) * rng.standard_normal((2, N))
    fizz = patchy(tiny + steam, depth_db=3.0, boil=boil)
    fizz = unit(filtered(fizz, lambda hz: amp(along(FIZZ_SPECTRUM, hz))))

    large = bubbles(250 + 2500 * boil, pitch_hz=2113, spread=0.543, cycles=0.99,
                    scatter_db=-1.5, wander_db=8.0, size=256)
    froth = rng.standard_normal((2, N))
    crackle = patchy(large + froth, depth_db=3.5, boil=boil)
    crackle = unit(filtered(crackle, lambda hz: amp(along(CRACKLE_SPECTRUM, hz))))

    # the level bunches into little clumps, shallower in a hard boil
    clumps_db = 1.33 * wobble(70) / (1 + 2 * boil)
    fizz = amp(clumps_db - 0.96) * np.sqrt(fizz_power) * fizz
    return fizz + amp(clumps_db - 3.5) * np.sqrt(crackle_power) * crackle


# the two ports hear the bowl in different colours: (f/Hz, left minus right/dB)
PORT_COLOUR = [(600, 5.5), (1700, 0), (3400, -0.5), (5500, -2), (7500, 1), (10000, -0.4), (13500, 0)]
# the pan is carried across the stove: (t/s, left minus right/dB)
PAN_PLACE = [(3.9, 4), (4.23, 2.5), (4.29, -8)]


def scene():
    """Superposition: direct oil and stove sounds, echoes of the oil, reverberation of both, background."""
    oil = filtered(sizzle() + pops() + ticks(), lambda hz: panned(along(PORT_COLOUR, hz)))
    stove = (pan() + strikes()) * panned(curves(PAN_PLACE)[0]) + clicks()
    room = kitchen(amp(-12) * (oil + stove))
    return oil + amp(-8.0) * counter(oil) + stove + room + background() + flutter()


def record(dry):
    """Band limitation: nothing is kept at or above TOP_HZ."""
    return filtered(dry, lambda hz: hz < TOP_HZ)


dry = scene()
out = record(dry)
bounce(out)
```